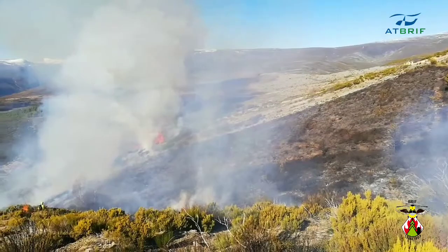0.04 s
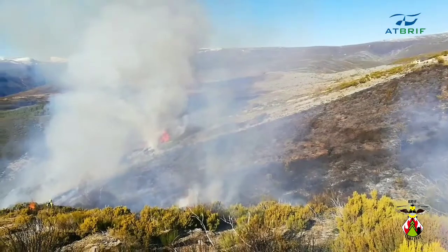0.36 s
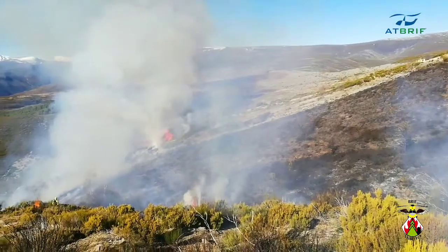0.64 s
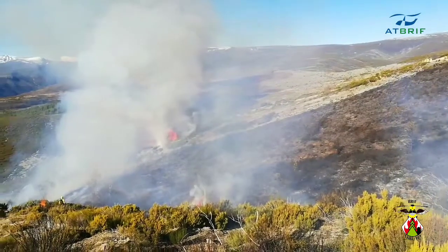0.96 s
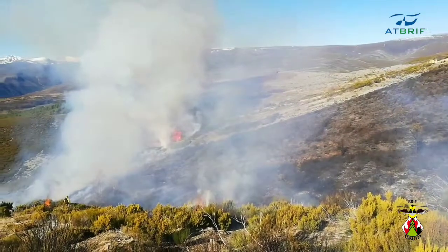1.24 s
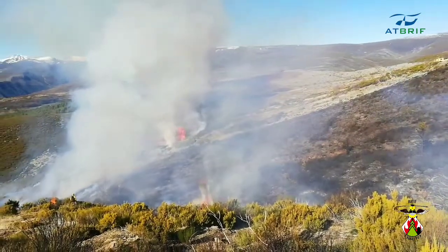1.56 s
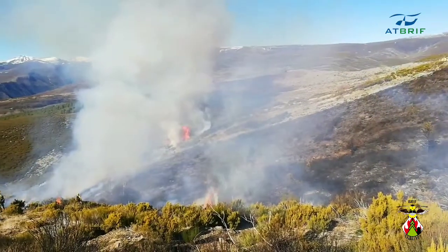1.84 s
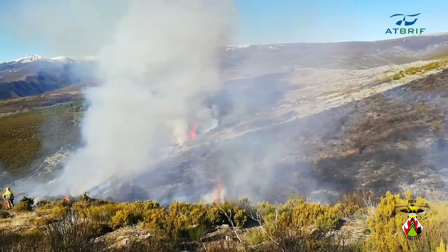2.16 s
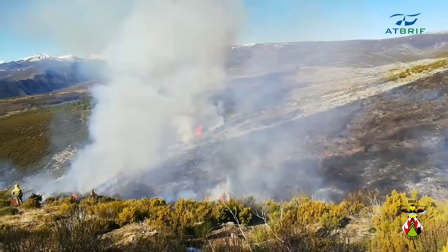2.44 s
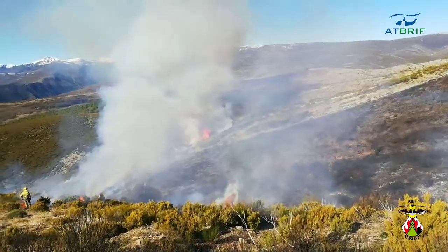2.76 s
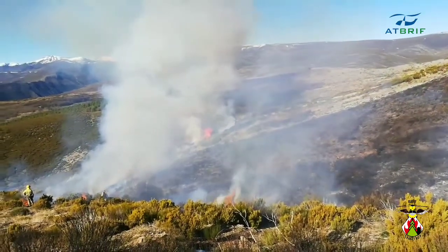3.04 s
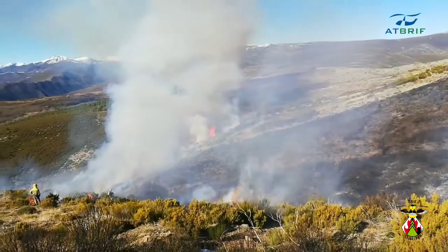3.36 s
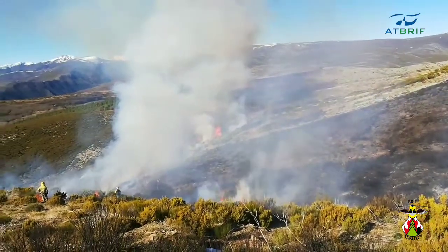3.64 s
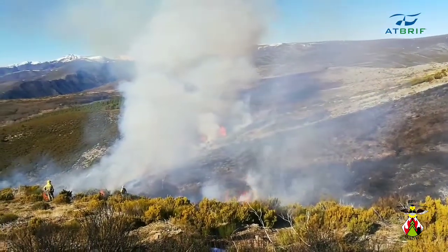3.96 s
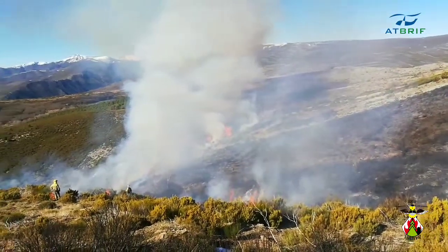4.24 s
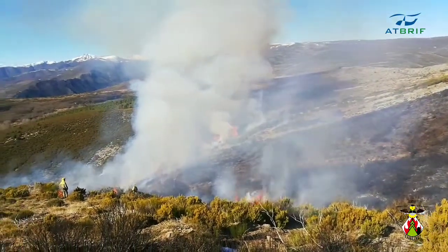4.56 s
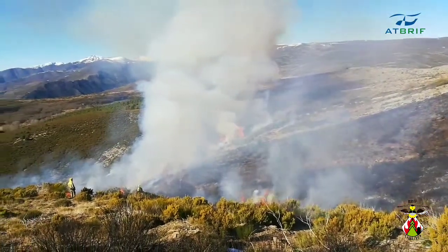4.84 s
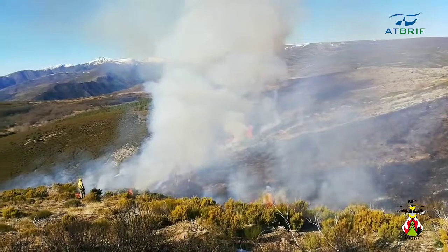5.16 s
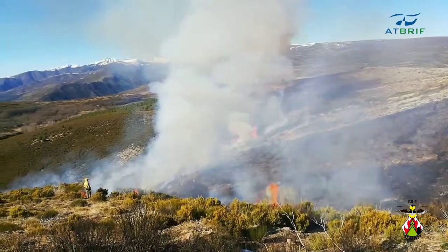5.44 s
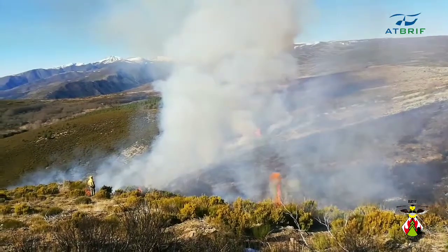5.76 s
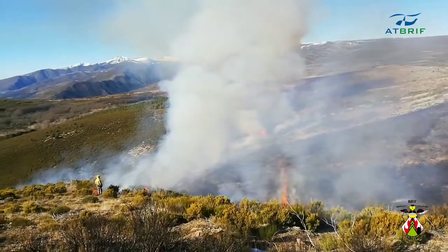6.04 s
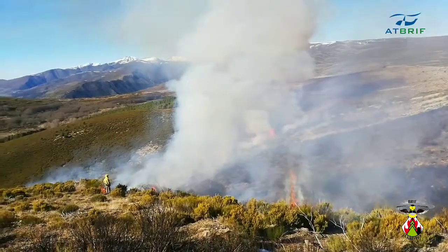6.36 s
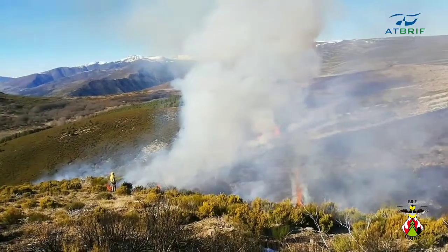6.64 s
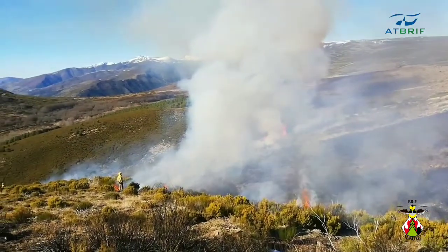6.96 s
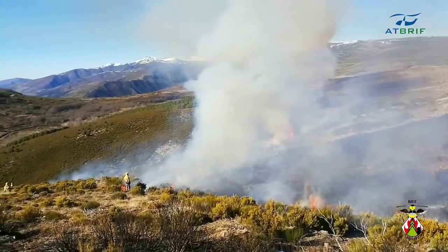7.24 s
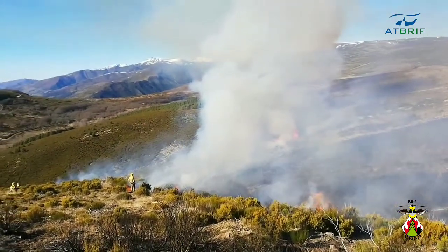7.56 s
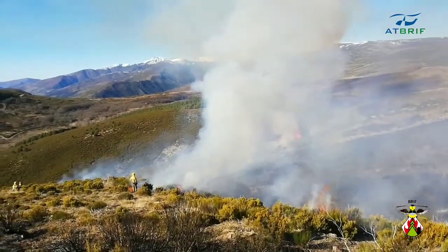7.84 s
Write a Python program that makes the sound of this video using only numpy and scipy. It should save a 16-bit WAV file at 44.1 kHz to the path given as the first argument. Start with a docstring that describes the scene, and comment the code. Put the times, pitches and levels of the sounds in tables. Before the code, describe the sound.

Grass and shrubs burn some way off on an open hillside, making a fine, flickering hiss with light crackling over a faint roar. The hiss swells and eases as bushes catch, and stems snap with short, sharp pops. Wind rumbles and thumps on the microphone in uneven gusts, on one side and then the other. Near the end the wind eases and the fire flares. There is no echo.

```python
"""A flickering hiss over a soft roar, with sharp pops and low gusty thumps: grass and scrub burn some way
off on an open, windy hillside. Countless tiny bursts superpose into the hiss, air drawn over the slope
makes the roar, and now and then steam splits a stem, which rings for an instant. Eddies press on the
two microphone ports, so the wind rumbles and slaps differently on the left and on the right."""
import sys
import numpy as np
from scipy import signal
from scipy.fft import rfft, irfft, next_fast_len
from scipy.io import wavfile
from scipy.ndimage import uniform_filter1d, map_coordinates

SR = 44100
rng = np.random.default_rng(int(sys.argv[2]) if len(sys.argv) > 2 else 0)


def wav_record(signal):
    """Record a signal, one row per channel, as 16-bit PCM in the file named by sys.argv[1]."""
    frames = np.transpose(np.atleast_2d(signal))
    bounded = np.clip(frames, -1, 1)
    # unit amplitude maps onto the largest positive 16-bit level
    quanta = np.round(bounded * 32767).astype(np.int16)
    wavfile.write(sys.argv[1], SR, quanta)


N = 357651

# Levels are relative; port 0 is left, port 1 right.
# bushes flaring: middle t/s, half-power length/s, level/dB re the steady burn, extra sap sizzle/dB
BUSH_FLARES = [(0.255, 0.77, -1.5, 1), (1.02, 0.27, -2, 3.5), (1.536, 0.41, 2.5, 2.5), (2.144, .55, 4, 2.5),
               (4.06, 0.37, 2.5, -3.5), (4.675, 0.34, -1.5, 0), (5.716, 0.58, 4, -1),
               (6.183, 0.31, 6.5, -7), (7.03, 0.16, 4, -8), (7.765, 0.57, 0.5, -3)]
# spectra of the sizzle, fine hiss, lower crackle and soft roar, with the recorder's rippled colouring:
# f/Hz, level/dB
SIZZLE_SPECTRUM = [(2500, -18.5), (4300, -16.5), (5100, -5), (5600, -6), (6400, -1), (7200, -2.5),
                   (8000, -8.5), (11000, -25), (15800, -43)]
HISS_SPECTRUM = [(3000, -17), (5000, -6.5), (7900, -3.5), (9200, 4), (10400, -2.5), (11500, -7.5),
                 (13900, -8), (15800, -17)]
CRACKLE_SPECTRUM = [(500, -22.5), (900, -4.5), (1250, -5.5), (1650, -3.5), (2150, 1), (2600, -3),
                    (3100, -5.5), (4000, -3.5), (5300, -8), (9000, -12), (16000, -46)]
ROAR_SPECTRUM = [(200, 1), (400, -8.5), (520, -10), (720, -4.5), (900, -11), (1200, -18.5), (2000, -24),
                 (5000, -61)]
# air drawn over the slope: t/s, level/dB
DRAUGHT_LEVELS = [(0, -68), (1, -72.5), (2.3, -71), (2.9, -68.5), (3.4, -67), (3.9, -70), (4.5, -71.5),
                  (5.5, -73), (7, -71.5), (8.1, -76)]
# light air between gusts: t/s, left level/dB, right level/dB
BREEZE_LEVELS = [(0, -63, -65), (1.0, -59, -55), (2.05, -61, -61.5), (3.1, -53.5, -53.5),
                 (4.35, -55.5, -51), (4.7, -57, -62.5), (5.3, -52.5, -55.5), (6.1, -56.5, -62),
                 (6.75, -58, -58), (8.1, -62, -60.5)]
# gusts: middle t/s, half-power length/s, eddy level/dB, swirl level/dB re the eddies, port
PORT_GUSTS = [(0.082, 0.14, -39.5, 0.5, 1), (0.267, .14, -39.5, -2.5, 1), (0.46, 0.1, -42.5, -8.5, 1),
              (1.312, 0.11, -46, -4.5, 0), (1.44, 0.12, -38, -1, 0), (1.44, 0.082, -41, -15, 1),
              (1.605, 0.14, -36.5, -9, 1), (1.629, 0.079, -33.5, -5.5, 0), (2.182, 0.027, -43.5, -3, 1),
              (2.396, 0.03, -49.5, -22, 0), (2.544, 0.057, -38.5, -3.5, 1), (2.713, 0.074, -44, -11.5, 1),
              (2.722, 0.038, -48, -15, 0), (2.937, 0.028, -41.5, -16, 1), (3.069, 0.056, -46.5, -14, 1),
              (3.485, 0.016, -48, 3, 1), (3.647, 0.086, -48, -2, 1), (3.788, 0.043, -41, -5, 1),
              (3.888, 0.05, -43.5, -9, 1), (4.082, 0.066, -37, -4, 1), (4.189, .1, -36, -8, 1),
              (4.892, 0.065, -43, -10.5, 1), (5.028, .06, -40, -6.5, 1), (5.098, 0.064, -35, -11.5, 1),
              (5.248, 0.033, -44, -25, 1), (6.291, 0.067, -47.5, -5, 1), (6.32, 0.099, -49, -11.5, 0),
              (6.524, 0.25, -51.5, -6.5, 1), (6.673, 0.11, -48, -16, 0)]
# spectra of wind pressure on a port, from slow to fast motion: f/Hz, level/dB
BREEZE_SPECTRUM = [(10, -1.5), (25, -1.5), (50, 2), (80, -1.5), (125, -7.5), (180, -16.5), (300, -32.5),
                   (600, -70), (2000, -100)]
EDDY_SPECTRUM = [(10, -19), (25, -9.5), (50, 0), (80, 1.5), (115, 0), (170, -10.5), (300, -34.5),
                 (600, -64), (2000, -100)]
SWIRL_SPECTRUM = [(40, -26), (100, -3.5), (150, 3.5), (220, 0), (320, -8.5), (450, -22), (700, -46),
                  (1500, -54)]
FLUTTER_SPECTRUM = [(80, -43), (200, -5), (330, 5), (550, -2), (750, -10), (1000, -20), (1500, -49)]
# the hardest vortices: t/s, level/dB, duration/s, port
VORTEX_SLAPS = [(0.063, -32, 0.0026, 1), (.083, -29, .0023, 1), (.472, -40.5, .0022, 1),
                (1.257, -37, .0026, 0), (1.328, -25.5, 0.0015, 0), (1.444, -23, 0.0025, 0),
                (1.465, -25, 0.0022, 0), (1.641, -26.5, 0.0017, 0), (3.677, -37.5, .0025, 1),
                (4.078, -30, 0.0026, 1), (4.171, -29.5, 0.0046, 1), (4.209, -28, 0.0032, 1),
                (5.095, -27, .005, 1)]
# bursting stems: t/s, level/dB, ring f/Hz, decay time/cycles, snap level/dB re the ring
STEM_BURSTS = [(0.1432, -24.5, 9000, .8, -12), (.4190, -41, 1980, 0.3, 4), (.4530, -46.5, 2200, 1.5, -8),
               (.9410, -31.5, 7200, 1.1, -16), (1.1222, -36.5, 5150, 2.1, 4), (1.123, -37, 2740, 1.1, -8),
               (1.3040, -20.5, 9400, 0.82, -12.5), (1.3795, -32, 1800, 0.1, -3),
               (1.6095, -35.5, 6270, 2.9, -25), (1.7415, -43, 3000, 1.3, -12), (2.0080, -35, 6000, 1, -18),
               (2.0962, -37, 6800, 1.5, -29), (2.16, -42, 3000, 1, -1), (2.17, -42, 2800, .6, -3),
               (2.313, -36, 5340, 1.2, -11), (3.3150, -49, 3180, 0.6, -10),
               (6.1943, -27.5, 5840, 1.3, -6.5), (6.3948, -40.5, 3070, 0.61, 0),
               (6.4009, -34, 1620, 1.3, -3), (6.4700, -23.5, 10100, 1.7, -9),
               (6.9024, -18.5, 9300, .8, -11), (6.939, -29, 7430, 1.5, -7), (7.3042, -40, 2070, 2.1, 4),
               (7.6724, -42, 1020, 1.3, -12), (7.6738, -34, 6500, 1.5, -15), (7.805, -38, 6060, 1.5, -22)]
# peaks and dips of the left port, then the right: f/Hz, width/Hz, gain/dB
PORT_RESONANCES = [
    [(7030, 1050, 3), (9200, 1260, -4), (13000, 2000, -2)],
    [(5100, 4500, 2), (7000, 910, -5), (9200, 2100, 1)],
]


def amp(db):
    """Amplitude ratio for a level in decibels."""
    return 10 ** (np.asarray(db) / 20)


def unit(x):
    """The signal scaled to rms 1."""
    return x / np.sqrt(np.mean(x ** 2) + 1e-20)


def curves(rows):
    """Linear interpolation of each column after the time, one value per sample."""
    times, *columns = np.transpose(rows)
    return [np.interp(np.arange(N) / SR, times, column) for column in columns]


def wobble(rate):
    """Smooth random modulation: a spline with `rate` knots a second."""
    return map_coordinates(rng.standard_normal(int(N * rate / SR) + 4), [np.arange(N) * rate / SR])


def swell(middle_s, length_s, edge):
    """A power envelope of peak 1 and half-power width length_s; edge 2 is Gaussian, more is steeper."""
    return .5 ** np.abs(2 * (np.arange(N) / SR - middle_s) / length_s) ** edge


def filtered(x, response):
    """Linear filtering: the spectrum is multiplied by a frequency response."""
    size = next_fast_len(N + 8192)
    return irfft(rfft(x, size) * response(np.fft.rfftfreq(size, 1 / SR)), size)[..., :N]


def coloured(x, spectrum):
    """Spectral shaping through (f/Hz, level/dB) points, at rms 1."""
    f, db = np.transpose(spectrum)
    return unit(filtered(x, lambda hz: amp(np.interp(np.log(hz + 1), np.log(f), db))))


def noise(shared):
    """Partially coherent stereo white noise: a fraction of the power is common to both sides."""
    return np.sqrt(shared) * rng.standard_normal(N) + np.sqrt(1 - shared) * rng.standard_normal((2, N))


def crackles(per_s, spread_db, life_s, shared):
    """Shot noise: tiny bursts, most of them faint, decay exponentially and add in power."""
    count = int(per_s * N / SR)
    when, rank = rng.random((count, 2)).T
    size = amp(spread_db * np.minimum(-np.log(1 - rank), np.log(500)))
    onsets = np.bincount((when * N).astype(int), size ** 2, N)
    t = np.arange(SR // 50) / SR
    power = signal.fftconvolve(onsets, np.exp(-2 * t / life_s))[:N]
    return unit(np.sqrt(np.abs(power)) * noise(shared))


def flares():
    """Incoherent sources add in power: the rise in dB of sizzle, hiss and crackle as bushes catch."""
    flames, sap = 0, 0
    for s, length, db, sap_db in BUSH_FLARES:
        flare = amp(db) ** 2 * swell(s, length, edge=1.52)
        flames += flare
        sap += amp(sap_db) ** 2 * flare
    crackle = amp(-2.5) ** 2 * flames  # the low crackle grows less than the hiss
    return 10 * np.log10(1 + np.array([sap, flames, crackle]))


def shimmer(x, depth_db):
    """Random amplitude modulation: narrow bands swell and fade for moments."""
    spectra = signal.stft(x, nperseg=1024)[2]
    field = uniform_filter1d(rng.standard_normal(spectra.shape[1:]), size=5, axis=0)
    field = uniform_filter1d(field, size=9, axis=1)
    return signal.istft(spectra * amp(depth_db * unit(field)), nperseg=1024)[1][:, :N]


def fire(sizzle_db, hiss_db, crackle_db):
    """Superposition of countless bursts: sap sizzles, fine grass hisses, thicker scrub crackles lower."""
    sizzle_rise, hiss_rise, crackle_rise = flares()
    twigs = amp(-11.5) * crackles(per_s=150, spread_db=2.5, life_s=0.001, shared=0.32)
    sap = noise(0.014) + amp(-1) * crackles(per_s=1500, spread_db=3, life_s=0.00095, shared=0.015)
    grass = noise(0.02) + amp(-4.5) * crackles(per_s=1400, spread_db=4, life_s=0.00094, shared=0.03)
    scrub = noise(0.14) + amp(-1.5) * crackles(per_s=500, spread_db=2.5, life_s=0.0031, shared=0.15)
    flicker_db = 0.59 * wobble(16) + 0.68 * wobble(7)  # the flames flicker in all three layers at once
    sizzle = amp(sizzle_db + sizzle_rise + flicker_db) * coloured(sap + twigs, SIZZLE_SPECTRUM)
    sizzle *= amp(0.83 * wobble(40))
    hiss = amp(hiss_db + hiss_rise + flicker_db) * coloured(grass + twigs, HISS_SPECTRUM)
    crackle = amp(crackle_db + crackle_rise + flicker_db) * coloured(scrub + twigs / 2, CRACKLE_SPECTRUM)
    return shimmer(sizzle + hiss + crackle, depth_db=1.9)


def draught(gain_db):
    """Flow noise: air drawn over the slope roars softly, nearly alike on both sides."""
    level_db, = curves(DRAUGHT_LEVELS)
    return amp(level_db + gain_db + wobble(7.8)) * coloured(noise(0.86), ROAR_SPECTRUM)


def gust_levels(port):
    """Power addition of gusts and light air: levels in dB of slow eddies and fast swirls on one port."""
    slow = amp(curves(BREEZE_LEVELS)[port]) ** 2
    fast = amp(-67.5) ** 2  # faint swirls never stop
    for s, length, db, swirl_db, side in PORT_GUSTS:
        if side == port:
            gust = amp(db) ** 2 * swell(s, length, edge=2.44)
            slow += gust
            fast += amp(swirl_db) ** 2 * gust
    return 10 * np.log10([slow, fast])


def vortices(per_s, spectrum):
    """Irregular vortex shedding: pressure pulses of random sign, size and spacing, at rms 1."""
    count = int(per_s * N / SR)
    when, size, sign = rng.random((count, 3)).T
    at = ((np.arange(count) + when) * (N - 1) / count).astype(int)
    pulses = np.bincount(at, (0.22 + size ** 2) * np.sign(sign - .5), N)
    return coloured(pulses, spectrum)


def wind(port, eddies_db, swirl_db, flutter_db, flutter_growth):
    """Turbulent pressure: a breeze rumbles, gusts shed eddies and swirls, the hardest ones flutter."""
    slow_db, fast_db = gust_levels(port)
    shed_share = 1 / (1 + amp(-2 * (slow_db + 46.5)))  # fraction of the slow power in distinct eddies
    breeze = unit(coloured(rng.standard_normal(N), BREEZE_SPECTRUM) * amp(2.2 * wobble(16)))
    eddies = np.sqrt(1 - shed_share) * breeze + np.sqrt(shed_share) * vortices(70, EDDY_SPECTRUM)
    puffs = wobble(40)
    swirls = unit(vortices(170, SWIRL_SPECTRUM) * amp(2.03 * puffs))
    flutter = unit(vortices(300, FLUTTER_SPECTRUM) * amp(5.7 * puffs))
    breakup = amp(flutter_db + flutter_growth * np.minimum(fast_db + 42.5, 0))
    return amp(slow_db + eddies_db) * eddies + amp(fast_db + swirl_db) * (swirls + breakup * flutter)


def vortex_slaps(gain_db):
    """A tight vortex crossing a port makes a bipolar pressure pulse: suction, then a push."""
    out = np.zeros((2, N + SR))
    t = np.arange(-SR // 50, SR // 50) / SR
    for s, db, duration, port in VORTEX_SLAPS:
        u = np.pi * t / duration
        pulse = u * np.exp((1 - u ** 2) / 2)
        out[port, round(s * SR) - len(t) // 2:][:len(t)] += amp(db + gain_db) * pulse
    return out[:, :N]


def stem_pops(kick_s, tear_s, scatter_db, scatter_s, gain_db):
    """Damped vibration: steam splits a stem, which kicks, tears and rings; brush scatters the sound."""
    out = np.zeros((2, N + SR))
    t = np.arange(SR // 40) / SR
    for s, db, hz, decay_cycles, snap_db in STEM_BURSTS:
        cycles = hz * t
        ring = np.sin(2 * np.pi * cycles) * np.exp(-cycles / decay_cycles) * (1 - np.exp(-cycles))
        kick = (1 - t / kick_s) * np.exp(-t / kick_s)
        tear = rng.standard_normal(len(t)) * np.exp(-t / tear_s)
        pole = np.exp(-4 * np.pi * hz / SR)  # a thicker stem rings lower and breaks less sharply
        snap = signal.lfilter([1 - pole], [1, -pole], amp(snap_db) * (kick + tear))
        burst = ring / np.abs(ring).max() + snap
        paths = rng.standard_normal((2, len(t))) * np.exp(-t / scatter_s)
        paths *= amp(scatter_db) / np.linalg.norm(paths, axis=1, keepdims=True)
        paths[:, 0] += 1  # the direct path
        for side, lag in enumerate(rng.integers(0, 3, size=2)):
            arrival = np.convolve(burst, paths[side])[:len(t)]
            out[side, round(s * SR) + lag:][:len(t)] += amp(db + gain_db) * arrival
    return out[:, :N]


def scene():
    """Superposition in a free field: fire ahead, unrelated eddies on each port, no echo off the slope."""
    pops = stem_pops(kick_s=0.000094, tear_s=0.00053, scatter_db=-0.5, scatter_s=0.0021, gain_db=-4.5)
    burn = fire(sizzle_db=-66, hiss_db=-66.5, crackle_db=-69.5) + draught(gain_db=1.9)
    left = wind(port=0, eddies_db=2.5, swirl_db=1, flutter_db=-7, flutter_growth=0.64)
    right = wind(port=1, eddies_db=1.5, swirl_db=-0.5, flutter_db=-18, flutter_growth=0.43)
    return burn + np.array([left, right]) + vortex_slaps(gain_db=-0.5) + pops


def record(dry):
    """Resonance colours the treble of each port in its own way; nothing passes above the band limit."""
    def response(hz, top_hz=15830):
        colour_db = [sum(db / (1 + (2 * (hz - centre) / width) ** 2) for centre, width, db in port)
                     for port in PORT_RESONANCES]
        return amp(colour_db) * (hz < top_hz)
    return filtered(dry, response)


dry = scene()
out = record(dry)
wav_record(out)
```